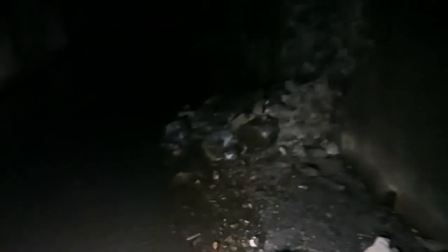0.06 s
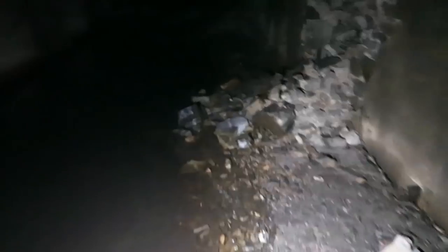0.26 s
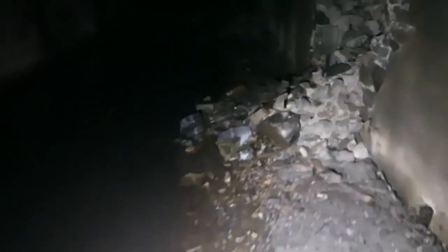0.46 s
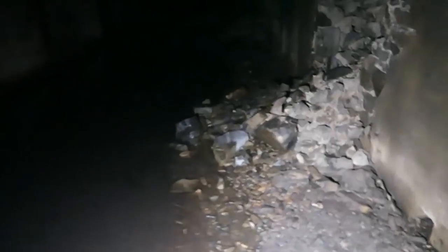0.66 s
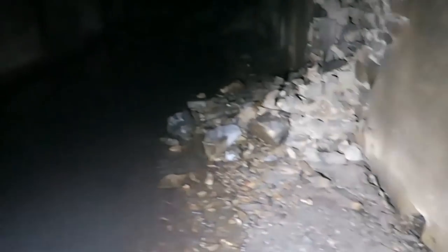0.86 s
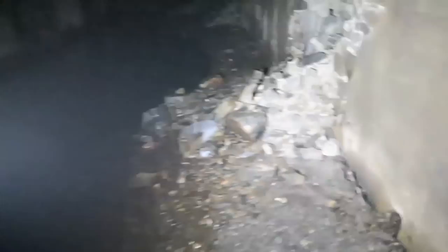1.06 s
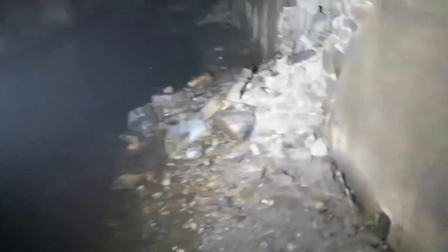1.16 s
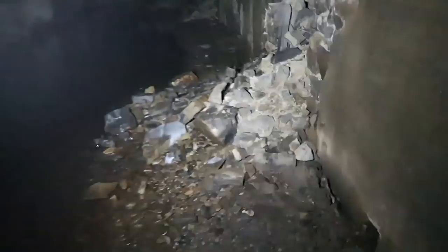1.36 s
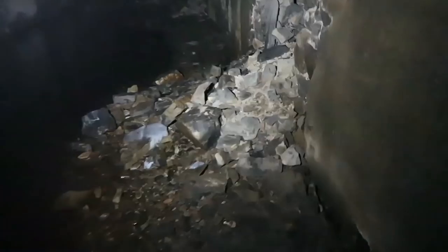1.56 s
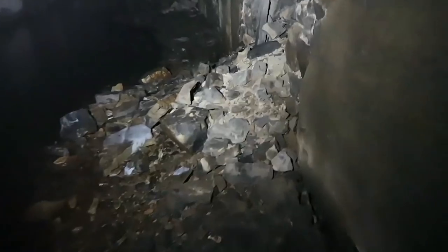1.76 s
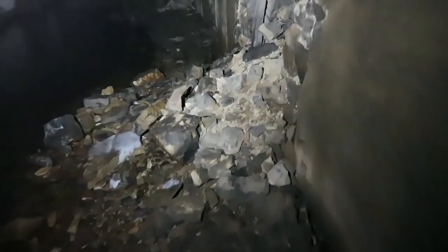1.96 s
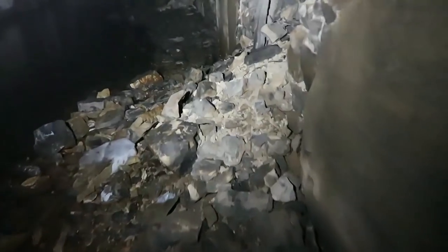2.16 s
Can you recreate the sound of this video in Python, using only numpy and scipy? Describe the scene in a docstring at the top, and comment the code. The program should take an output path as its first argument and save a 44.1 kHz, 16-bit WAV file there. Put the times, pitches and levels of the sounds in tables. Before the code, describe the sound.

Slow footsteps crunch on damp rubble in a concrete tunnel, heard close up. The loudest lands at about 0.25 seconds with a hollow stone knock, grinding and a gritty scuff. Softer steps follow at 1.1 and 1.7 seconds, with gravel scraping and pebbles ticking between them. Each step echoes. Faint distant drips fall around 1.7 and 2.1 seconds, and a quiet rumble and hiss continue throughout.

```python
"""Three slow steps crunch over damp rubble in a concrete tunnel, heard from the walker's hand.
Each boot knocks on the stones, grinds them under its weight and scuffs the fine grit; single pebbles tick.
Knocks are damped tones; grinding and scuffing are clouds of tiny clicks.
The tunnel rings on, water drips far off, and a faint rumble and hiss lie under everything."""
import sys
import numpy as np
from scipy import signal
from scipy.fft import rfft, irfft
from scipy.io import wavfile

SR = 44100
rng = np.random.default_rng(int(sys.argv[2]) if len(sys.argv) > 2 else 0)


def wrap_up_sound(samples):
    """Save the sound to the file named by the first command line argument, as 16-bit audio."""
    columns = np.atleast_2d(samples).T
    # keep every value between -1 and 1, then stretch to whole-number steps
    tamed = np.clip(columns, -1, 1)
    steps = np.round(tamed * 32767).astype(np.int16)
    wavfile.write(sys.argv[1], SR, steps)


N = 97020
TIME = np.arange(N) / SR
FREQS = np.maximum(np.arange(N // 2 + 1) * SR / N, 1)


def from_db(db):
    """Decibels to gain."""
    return 10 ** (np.asarray(db) / 20)


def rms_one(x):
    """Scale to unit RMS."""
    return x / np.sqrt(np.mean(x ** 2) + 1e-20)


def eq_curve(points):
    """A gain for every frequency, drawn through (f/Hz, level/dB) points."""
    hz, db = np.transpose(points)
    return from_db(np.interp(np.log(FREQS), np.log(hz), db))


def colour(x, gains):
    """Shape a signal with an EQ curve and bring it to unit RMS."""
    return rms_one(irfft(rfft(x) * gains, N))


def damped_ring(start, db, hz, swell, glide_hz_per_s=0):
    """A struck tone that swells smoothly to its peak and dies straight away."""
    t = TIME - start
    age = np.clip(t / swell, 0, 30)
    envelope = from_db(db) * (age * np.exp(1 - age)) ** 2
    return envelope * np.sin(2 * np.pi * (hz + glide_hz_per_s * t / 2) * t)


def grains(per_s, spread_db):
    """Tiny collisions as random clicks; a positive spread makes some louder, a negative one softer."""
    sizes = from_db(spread_db * np.minimum(rng.exponential(1, N), 4))
    polarity = rng.choice([-1, 1], N)
    return sizes * polarity * (rng.random(N) < per_s / SR)


def rub(start, db, hold, release, attack_s=0.012):
    """Pressure of the sole: a quick attack, a hold timed from the start, then a release."""
    t = TIME - start
    return from_db(db) * np.clip(t / attack_s, 0, 1) * np.exp(-np.maximum(t - hold, 0) / release)


def tunnel_air():
    """Room tone: a low rumble with a thin hiss, gently dipping and rising."""
    # tone of the air: f/Hz, level/dB
    spectrum = [(20, 6), (45, -1.5), (80, -4), (200, -11.5), (380, -7.5), (650, -13.5), (1050, -15),
                (1800, -25.5), (3200, -26.5), (5300, -27), (7500, -30), (13000, -33)]
    # level ride: t/s, level/dB
    ride = [(0, -60.5), (.5, -61), (.87, -65), (1.1, -60), (1.6, -62.5), (2.2, -61)]
    level = from_db(np.interp(TIME, *np.transpose(ride)))
    return level * colour(rng.standard_normal(N), eq_curve(spectrum))


def pebbles(crest_db=4):
    """Each pebble ticks with a tiny burst of noise around its own pitch."""
    # pebble ticks: t/s, rough peak level/dB, f/Hz, width/octaves, decay/s
    ticks = [(.078, -58.5, 7900, 2.7, 0.0011), (0.2223, -53, 9000, 2.4, 0.00077),
             (0.244, -54.5, 3050, 0.28, .004), (0.2547, -47, 2080, 0.17, 0.0013),
             (0.399, -54, 3230, 0.2, 0.0036), (.462, -55, 1680, 0.11, 0.0049),
             (0.46, -58, 3800, 0.69, 0.0023), (.587, -49.5, 10600, 0.58, 0.0012),
             (0.953, -58, 4000, 2.5, 0.0034), (1.0485, -58, 6500, 1.1, 0.0057),
             (1.094, -48, 3840, .4, 0.0013), (1.127, -52, 4500, 0.19, .003), (1.217, -58, 10000, 1, 0.0025),
             (1.2265, -58, 2350, 0.42, 0.011), (1.275, -52.5, 10100, 1.8, 0.0018),
             (1.417, -57, 9900, 1, 0.0038), (1.486, -60, 5350, 1.7, 0.0013),
             (1.69, -53.5, 1530, 2.5, 0.0022), (1.811, -56, 4400, .4, 0.0048)]
    out = 0
    for start, db, hz, width, decay in ticks:
        t = TIME - start
        fade = (t > 0) * np.exp(-np.minimum(abs(t) / decay, 50))
        resonance = np.exp(-.5 * (np.log2(FREQS / hz) / (width / 2)) ** 2)
        out += from_db(db - crest_db) * fade * colour(rng.standard_normal(N), resonance)
    return out


def boots(edge_swell_cycles=1.02):
    """Boots knock on stone with a brief, higher edge, over the low thump of the weight."""
    # boot on stone: t/s, peak level/dB, f/Hz, swell/s, edge level re knock/dB, edge f/Hz
    knocks = [(0.2424, -27, 490, 0.0018, -20, 890), (0.2534, -16.5, 501, 0.0019, -19, 1080),
              (.2592, -23.5, 394, 0.0027, -17.5, 1150), (0.2695, -24, 328, 0.001, -10.5, 1086),
              (1.088, -30, 386.5, 0.0047, -5.5, 640), (1.112, -43, 348, 0.0036, -16, 730),
              (1.1325, -35, 400, 0.0021, -9, 700), (1.2264, -44, 419, .0045, -5.5, 860),
              (1.7295, -42.5, 710, 0.0072, -16, 1060), (1.736, -33, 380, 0.0032, -6.5, 818),
              (1.812, -44.5, 434, 0.011, 2, 850)]
    # weight landing and jolts of the hand: t/s, peak level/dB, f/Hz, swell/s
    thumps = [(0.213, -40, 23.3, 0.025), (.245, -33, 48, 0.027), (0.241, -36.5, 128.3, 0.014),
              (.785, -60, 45, 0.017), (0.953, -53, 36, 0.028), (0.986, -49.5, 71, 0.012),
              (1.088, -37, 159, 0.0035), (1.097, -46, 65.8, .024), (1.123, -42, 26, 0.033),
              (1.36, -63, 55.3, 0.011), (1.407, -48, 75.7, 0.016), (1.415, -48.5, 32.2, 0.021),
              (1.724, -47.5, 54, 0.017), (1.733, -48, 207.4, 0.01), (2.064, -54.5, 61.6, .012)]
    out = sum(damped_ring(*thump) for thump in thumps)
    for start, db, hz, swell, edge_db, edge_hz in knocks:
        body = damped_ring(start, db, hz, swell)
        edge = damped_ring(start, db + edge_db, edge_hz, edge_swell_cycles / edge_hz)
        out += body + edge
    return out


def rubble():
    """Big stones grind dully and gravel crunches, both as dense small collisions."""
    # stones grinding under the sole: t/s, level/dB, hold/s, release/s
    grinds = [(0.217, -56.5, 0.012, .01), (0.261, -45, 0.056, 0.023), (.945, -67.5, 0.01, 0.013),
              (1.058, -58.5, 0.014, 0.0073), (1.11, -53, 0.058, 0.0084), (1.228, -54.5, 0.013, .022),
              (1.328, -62.5, 0.07, .04), (1.705, -56, 0.019, 0.0044), (1.76, -50.5, 0.063, 0.035)]
    # dull tone of the stones: f/Hz, level/dB
    stone_tone = [(50, -42), (130, 3), (250, 2), (400, 3.5), (650, 6), (900, -4), (1300, -17.5),
                  (2200, -21), (6000, -46)]
    # gravel crunches: t/s, level/dB, hold/s, release/s
    crunches = [(0.28, -62, 0.031, 0.018), (1.072, -63, 0.066, 0.016), (1.162, -58, 0.0095, 0.018),
                (1.22, -62.5, 0.014, 0.025), (1.362, -66.5, 0.01, 0.022), (1.4, -61.5, 0.022, 0.02),
                (1.715, -59, 0.059, 0.11)]
    # brighter tone of the gravel: f/Hz, level/dB
    gravel_tone = [(300, -11), (700, -0.5), (1100, -1.5), (1600, -2.5), (2700, -8.5), (4000, -16.5),
                   (13000, -28)]
    stones = colour(grains(per_s=3000, spread_db=-1.5), eq_curve(stone_tone))
    gravel = colour(grains(per_s=8000, spread_db=1.0), eq_curve(gravel_tone))
    return stones * sum(rub(*row) for row in grinds) + gravel * sum(rub(*row) for row in crunches)


def grit():
    """Sand scuffs under the sole: very dense grains, with a steep-sided band of rasp over a bright bed."""
    # scuffs: t/s, level/dB, hold/s, release/s, rasp f/Hz, rasp half-width/octaves, bed gain/dB
    scuffs = [(0.27, -54, 0.064, 0.018, 4820, 0.25, -3), (0.403, -68.5, 0.09, 0.15, 4840, 0.15, -1),
              (0.678, -75, 0.033, 0.049, 6000, .3, 11), (1.058, -64, 0.059, 0.025, 11000, 0.51, -2),
              (1.093, -57.5, 0.014, 0.0093, 4000, 0.27, -29), (1.121, -57.5, 0.014, 0.015, 4160, 0.33, -20),
              (1.186, -71.5, 0.092, 0.074, 5000, 0.25, -5), (1.405, -66.5, 0.019, 0.055, 5570, 0.24, -5),
              (1.55, -73.5, 0.15, 0.017, 3900, 0.45, -9), (1.717, -66.5, 0.12, 0.088, 4860, 0.4, -5),
              (2.107, -72.5, 0.16, .03, 5140, 0.29, -12)]
    # broad, bright bed of the sand: f/Hz, level/dB
    bed_tone = [(700, 9), (1500, -13), (3000, 5), (6300, 8.5), (7500, 1.5), (10000, 2), (12500, 6),
                (14000, 2.5)]
    sand = grains(per_s=15000, spread_db=2.5)
    bed = eq_curve(bed_tone)
    out = 0
    for start, db, hold, release, hz, width, bed_db in scuffs:
        rasp = np.exp(-.5 * (np.log2(FREQS / hz) / width) ** 4)
        out += rub(start, db, hold, release) * colour(sand, rasp + from_db(bed_db) * bed)
    return out


def drips(swell_s=0.017, sag_hz_per_s=140):
    """Far drops ring as soft, nearly pure notes that sag slightly in pitch."""
    # falling drops: t/s, peak level/dB, f/Hz
    drops = [(1.53, -70, 2000), (1.712, -53.5, 1053), (2.136, -58.5, 1063)]
    return sum(damped_ring(start, db, hz, swell_s, -sag_hz_per_s) for start, db, hz in drops)


def echoes(t60_s, delay_s):
    """Dense reflections of unit energy that have faded in by the delay and die away."""
    fade_in = np.clip(2 * TIME / delay_s - 1, 0, 1)
    tail = rng.standard_normal(N) * from_db(-60 * TIME / t60_s) * fade_in
    return rms_one(tail) / np.sqrt(N)


def tunnel(x, near_wall_db=-15):
    """A quick slap from the near wall, a long tail with its own decay per band, and a hollow ring."""
    # reverb tail by band: f/Hz, level/dB, t60/s
    tail_bands = [(54, -35, 0.22), (120.6, -7, 0.72), (222, -5.5, 0.96), (447, -14.5, 1.06),
                  (788, -9, 0.75), (1400, -4, 0.75), (2550, -11, 2.3), (4650, -15.5, 0.34),
                  (12300, -35, 0.29)]
    # standing waves between the walls: f/Hz, gain at resonance/dB, t60/s
    wall_modes = [(128, -4.5, 3), (249.6, 3, 1.1), (317, -21, 1.1), (374, 2.5, 0.79), (580, 2, 1.6),
                  (687, -11, 3)]
    response = from_db(near_wall_db) * echoes(t60_s=0.057, delay_s=0.0027)
    log_centres = np.log([hz for hz, _, _ in tail_bands])
    for share, (_, db, t60) in zip(np.eye(len(tail_bands)), tail_bands):
        band = np.sqrt(np.interp(np.log(FREQS), log_centres, share))   # equal-power crossfade
        response += from_db(db) * irfft(rfft(echoes(t60, delay_s=0.017)) * band, N)
    for hz, db, t60 in wall_modes:
        decay_rate = np.log(1000) / t60
        ring = np.exp(-decay_rate * TIME) * np.sin(2 * np.pi * hz * TIME)
        response += from_db(db) * 2 * decay_rate / SR * ring
    return signal.fftconvolve(x, response[:3 * N // 4])[:N]


def scene():
    """Steps and drips echo over the room tone, all dead centre, alike in both ears."""
    direct = boots() + rubble() + grit() + pebbles() + drips()
    mix = direct + tunnel(direct) + tunnel_air()
    return np.array([mix, mix])


def record(dry):
    """A steep low-pass takes off the very top."""
    cutoff_hz = 13450
    return signal.sosfiltfilt(signal.ellip(10, .1, 50, cutoff_hz, fs=SR, output="sos"), dry)


dry = scene()
out = record(dry)
wrap_up_sound(out)
```